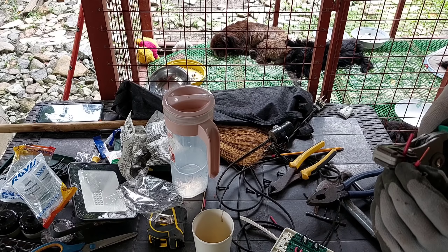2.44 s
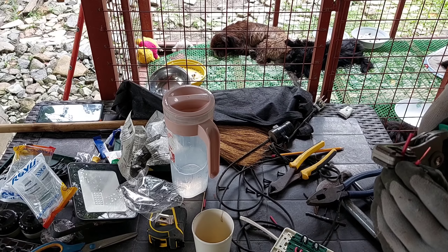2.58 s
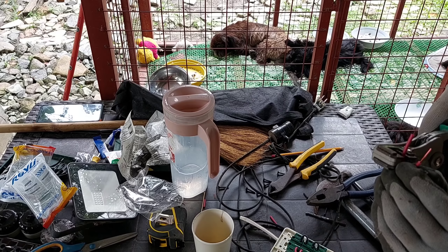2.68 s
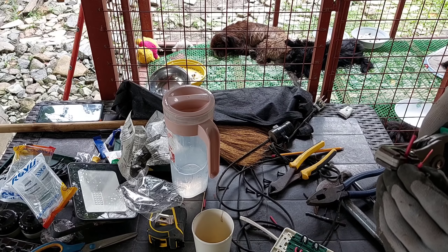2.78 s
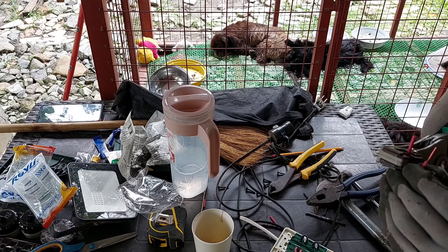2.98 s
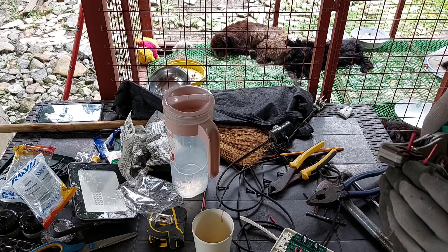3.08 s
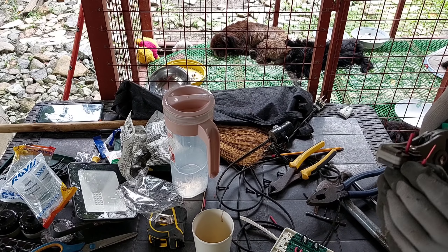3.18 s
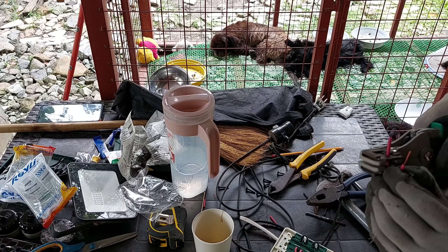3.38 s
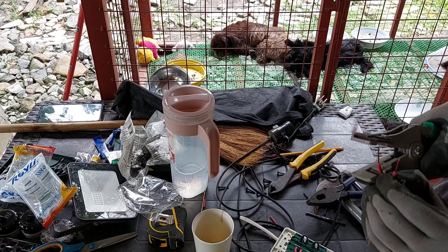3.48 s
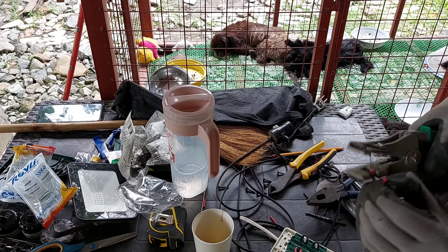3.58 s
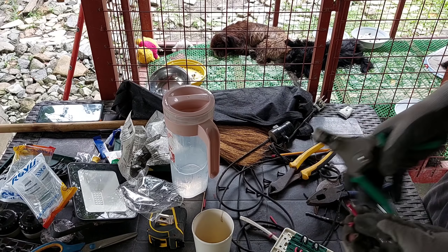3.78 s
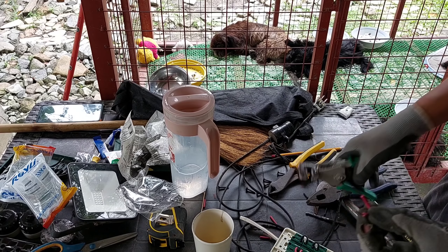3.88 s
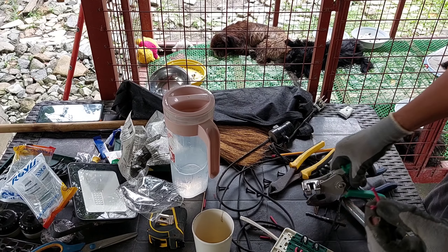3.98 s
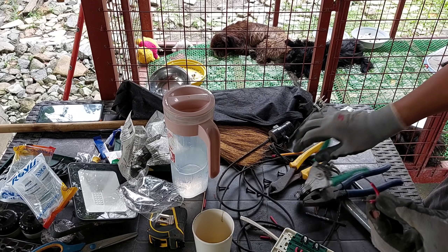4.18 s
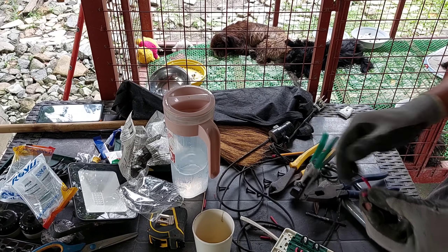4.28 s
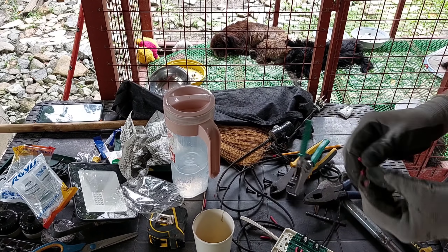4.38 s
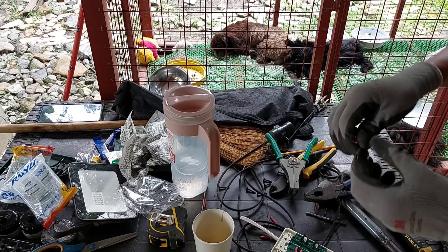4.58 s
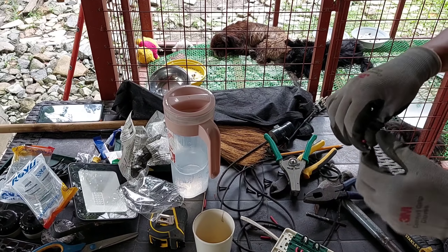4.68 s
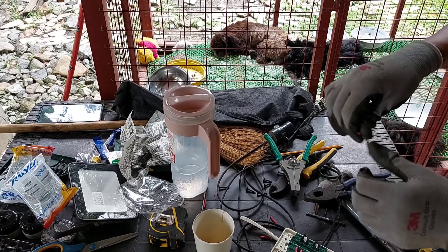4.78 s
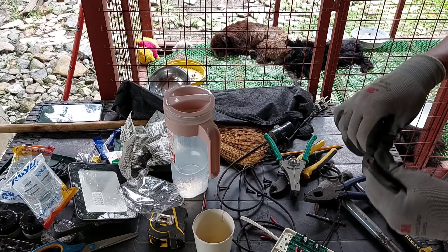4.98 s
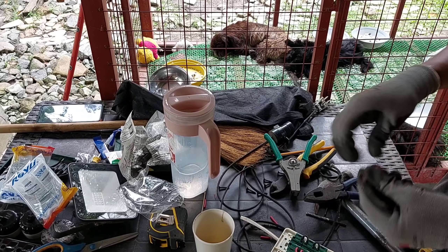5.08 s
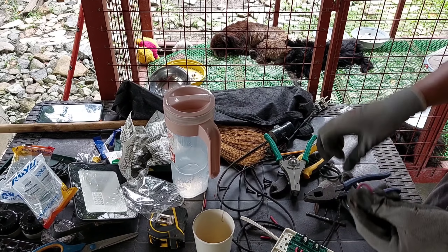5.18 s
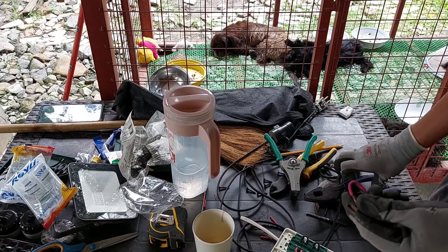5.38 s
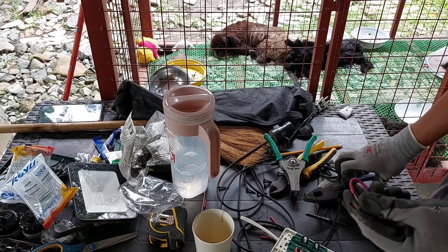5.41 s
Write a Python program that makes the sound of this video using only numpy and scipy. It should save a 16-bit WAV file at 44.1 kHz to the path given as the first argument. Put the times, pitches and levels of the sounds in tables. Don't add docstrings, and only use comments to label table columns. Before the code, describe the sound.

A stereo microphone near a cluttered workbench catches small steel clicks and two bright, dry snips of wire cutters with brief tearing insulation. A heavy hollow knock follows as the tool is put down, with sliding, small ticks and lighter bumps, then a sharp clank on metal. Short sparse echoes; quiet low traffic, leaf hiss, high insect buzz and distant birds.

```python
import sys
import numpy as np
from scipy import signal
from scipy.fft import rfft, irfft, next_fast_len
from scipy.io import wavfile
from scipy.ndimage import uniform_filter1d

SR = 44100
rng = np.random.default_rng(int(sys.argv[2]) if len(sys.argv) > 2 else 0)


def volts_from_decibels(level):
    exponent = np.asarray(level, float) / 20
    return 10 ** exponent


def dump(signal):
    limited = np.clip(np.atleast_2d(signal).T, -1, 1)
    pcm = np.round(limited * 32767).astype(np.int16)
    wavfile.write(sys.argv[1], SR, pcm)


N = 261513


def jaws():
    # t/s, peak level/dB, brightness/(dB per octave), echo/dB, left minus right/dB
    clicks = [(1.3411, -33.5, -0.5, -7, -7), (1.3914, -28, 3, -16, -3), (1.403, -41, 9, -10, 0),
              (1.4088, -27, -0.5, -9.5, 2), (1.419, -36, 0, -10, 0), (1.4590, -33, -3.5, -11.5, 1),
              (1.5842, -23, 4, -11, -4), (1.5955, -25, 9, -6, -10), (1.6146, -12.5, 1.5, -5.5, 8.5),
              (1.6215, -33, 4, -7, 4), (1.628, -26, 2, -13, -5), (3.3395, -36, 2, -15, -6),
              (3.3605, -40, 0, -0.5, 8), (3.3755, -41, -4, -7, 0), (3.3847, -41.5, -4, -7, -3),
              (3.5331, -38.5, 2.5, 2.5, 3), (3.5435, -20.5, 5, -10, -4), (3.5478, -31, -3.5, -11, 0),
              (3.695, -45, -6, 1, 0), (3.6995, -29.5, 6, -4, -3), (3.7204, -23, 0.5, 4.5, -12),
              (3.7235, -22.5, 2, -6, 1), (3.7296, -20, 4, -5, 8), (3.7425, -19, 2, -19, 4),
              (3.7502, -11.5, 2.5, -7, -12), (3.7515, -19, 6, -4, -1), (3.7545, -24, 2, -10, 1),
              (3.7615, -26, 7, -8, 2), (3.8452, -27.5, -8.5, -8, 3), (4.1638, -29.5, -5, -5.5, 4),
              (4.1873, -39, -6, -13, -1.5)]
    # t/s, peak level/dB
    fidgets = [
        (.974, -53.5),
        (1.16, -54.5),
        (1.321, -52),
        (1.5721, -41),
        (2.8718, -55),
        (3.517, -59),
        (3.987, -51.5),
    ]
    # f/Hz, level/(dB per Hz)
    jaw_spectrum = [(410, -55), (700, -16), (1840, -10), (2490, -5), (2960, -11.5), (3160, -4.5),
                    (3700, -9.5), (4820, 1), (5730, -4.5), (7170, -0.5), (14800, 1.5), (15900, -3),
                    (16500, -40)]
    # f/Hz, level/(dB per Hz)
    tear_spectrum = [(410, -49), (700, -35), (1910, -42), (2490, -7), (2700, -4.5), (2810, -17), (4060, 5),
                     (4900, 6.5), (5900, -16), (6900, 1), (13200, 5.5), (15900, 9), (16500, -50)]
    # t/s, rise/s, t60/s, level/dB
    tears = [
        (1.345, .008, 0.14, -53),
        (1.42, 0.092, 0.26, -57),
        (1.63, 0.044, 0.12, -26),
        (3.385, 0.082, 0.14, -66),
        (3.77, 0.049, 0.12, -27.5),
    ]
    tilt_db, echo_db = -6.5, 2
    rows = clicks + [(*row, tilt_db, echo_db, 0) for row in fidgets]
    direct, sent = cracks(rows, jaw_spectrum, fall_s=0.0011)
    tear = evened(coloured(grains(3000, spread_db=3.2), tear_spectrum))
    tear = tear * swells(*np.transpose(tears))
    return direct + tear + shelter(sent + tear[:1])


def jolts():
    # t/s, peak level/dB, f/Hz, t60/s
    pushes = [
        (1.6155, -12, 68, 0.03),
        (3.751, -14, 61, 0.036),
        (3.533, -30.5, 295, 0.071),
    ]
    out, t = np.zeros(N), np.arange(SR // 5) / SR
    for s, db, hz, t60 in pushes:
        phase = 2 * np.pi * hz * t * (1 + 2.5 * np.exp(-t / 0.0023))
        swing = -np.cos(phase) * (1 - np.exp(-t / 0.00071))
        add(out, s, volts_from_decibels(db - 60 * t / t60) * swing)
    return out * volts_from_decibels([[2.5], [-2.5]])


def steel():
    # t/s, peak level/dB
    strikes = [
        (4.1631, -30.5),
        (4.222, -20),
        (5.8786, -13.5),
        (5.9244, -21),
    ]
    # f/Hz, level/dB, t60/s
    strike_modes = [
        [(4460, -12, 0.12), (5040, -5, 0.056), (6400, -22, 0.09), (10250, -16, .04)],
        [(2240, 2, 0.097), (2285, -8.5, 0.17), (1707, -14, 0.16), (2896, -22, .25), (3395, -1, 0.045),
         (4330, -9, 0.1), (6304, -8, 0.088), (6600, -12, 0.096), (7930, -13.5, .06), (5140, -18, 0.073),
         (9540, -19.5, 0.18), (12630, -19, .18), (13900, -23, 0.14), (14790, -29, 0.15)],
        [(2110, -6, 0.062), (3510, 6, 0.03), (4380, -2, 0.06), (5240, -3, 0.083), (1307, 4.5, 0.06),
         (6580, -1, 0.11), (5980, -6, .12), (3919, -12, 0.07), (9240, -12.5, 0.32), (10550, -16, .12),
         (11200, -17, .12), (12650, -15, .3), (14270, -14, .05), (15180, -9, .04)],
        [(2820, -2, 0.021), (4330, -9, 0.02), (6020, -20, .1)],
    ]
    # t/s, peak level/dB
    cuts = [
        (1.342, -41),
        (1.615, -23),
        (3.751, -23),
    ]
    # f/Hz, level/dB, t60/s
    blade_modes = [(4310, -6, .16), (4560, -4, .2), (4700, -2, .22), (4795, 0, .22), (4910, -3, .2),
                   (5045, -2, .14), (5520, -8, .15), (7805, -7, .15), (12245, -6, .17), (12745, -5, .12)]
    out = np.zeros(N)
    for (s, db), modes in zip(strikes, strike_modes):
        add(out, s, volts_from_decibels(db) * ring(modes, 0))
    for s, db in cuts:
        add(out, s, volts_from_decibels(db) * ring(blade_modes, 3.8, detune=0.0022))
    direct = np.array([np.roll(out, 5), out])
    return direct + volts_from_decibels(-5.0) * shelter(out[None])


def bench():
    # f/Hz, level/dB, t60/s
    top_modes = [(125.7, -5, 0.6), (240, -2, 0.22), (173, -0.5, 0.12), (429, -8, 0.19), (260, -1, 0.049),
                 (306.8, -2.5, 0.16), (330.6, -4.5, 0.25), (375, 0, 0.11), (464, -4, 0.14), (567, -6, 0.13),
                 (522, -8, 0.11), (664, -8, 0.11), (739, -11.5, 0.067), (920, -16, 0.076),
                 (1060, -37, 0.035), (1350, -25, 0.051)]
    # t/s, peak level/dB, hardness/(dB per octave), frame level/dB, f most woken/Hz
    blows = [(4.159, -41, 14, -7, 227), (4.2205, -22, 21, -2, 727), (4.3372, -5, -0.5, -3, 342),
             (4.449, -15.5, -3, -9, 319), (4.562, -29, -12, 4, 240), (4.607, -20, -14, -3, 237),
             (4.619, -23.5, -3, 1, 251), (4.635, -22, -2, -8, 312), (4.650, -19.5, -6, -8, 325),
             (4.682, -26, -4, -6, 257), (4.782, -25.5, -13, -3, 243), (4.803, -16, -3, -27, 557),
             (4.817, -16, 0, -20, 300), (4.903, -32.5, -3, 2, 260), (5.475, -33, -15.5, -14, 171),
             (5.586, -33.5, -8.5, -4, 153), (5.691, -32.5, 13.5, -9, 486), (5.794, -33, 4, 5, 242),
             (5.8774, -10.5, 9, 2, 736), (5.8814, -10.5, -3, 0.5, 180), (5.907, -15, 2, -12, 194),
             (5.924, -5.5, -2, -4, 242)]
    # t/s, rise/s, t60/s, rumble level/dB, rattle level/dB
    slides = [(4.166, 0.014, 0.2, -35.5, -44.5), (4.222, 0.0032, 0.34, -27.5, -39.5),
              (4.341, 0.0051, 0.52, -14.5, -33), (4.4, 0.061, 0.063, -18, -39.5),
              (4.47, 0.028, 0.2, -28, -36), (4.669, 0.095, 0.48, -25, -38), (4.804, 0.0032, 0.23, -27, -49),
              (4.9, .05, 0.45, -40, -60), (5.486, 0.043, 0.28, -40.5, -67), (5.59, 0.013, 0.39, -46, -66),
              (5.694, 0.014, 0.25, -42, -52), (5.878, 0.0031, 0.46, -18, -33.5),
              (5.926, 0.006, 0.27, -30, -24.5)]
    # f/Hz, level/(dB per Hz)
    rattle_spectrum = [(530, 2.5), (900, -1), (1480, -2.5), (2270, -5.5), (4600, -13), (6700, -21.5),
                       (11200, -25.5), (15200, -29), (15900, -38), (16500, -66.5)]
    # t/s, peak level/dB, brightness/(dB per octave), echo/dB
    part_ticks = [(4.2223, -27, 7, -15), (4.3385, -15, -7, -7.5), (4.3534, -25.5, 1, 0),
                  (4.395, -32, 7, -3.5), (4.4538, -31, -1, 0), (4.5517, -39, 4, -12), (4.6097, -38, 0, -2),
                  (4.6551, -26.5, -3.5, -10), (4.6838, -32.5, 5.5, -8), (4.6945, -30, -3, 0.5),
                  (4.7849, -36, -4, -8), (4.803, -29, -1, -1), (4.9023, -43, -1.5, 2),
                  (5.0911, -44.5, -3, -8), (5.693, -59, 5, -1), (5.8775, -24.5, -6, -12),
                  (5.8825, -22.5, -2, -5), (5.891, -25, 2, 0), (5.908, -22, 1, 0)]
    contact_s = .0008
    rise = np.minimum(np.arange(SR // 5) / SR / contact_s, 1)
    out = np.zeros((2, N))
    for s, db, hard_db, frame_db, spot_hz in blows:
        modes = np.array(top_modes)
        modes[0, 1] += frame_db
        octaves = np.log2(modes[:, 0] / spot_hz)
        modes[:, 1] += 9.7 * np.exp(-(octaves / 0.12) ** 2)
        blow = [ring(modes, 2.5, hard_db, damping=0.99, detune=.012) for port in out]
        add(out, s + 0.001336, volts_from_decibels(db) * np.array(blow) * rise)

    s, rise_s, t60, rumble_db, rattle_db = np.transpose(slides)
    rumble = swells(s, rise_s, t60, rumble_db)
    rattle = swells(s, rise_s, t60 / 1.58, rattle_db)
    for spot in range(3):
        body = ring(top_modes[1:], 2.5, damping=2.6, detune=.03)
        body = body[None] / np.linalg.norm(body)
        bumps = evened(grains(300, spread_db=3.0)) * rumble
        out += volts_from_decibels(-9.5) * signal.oaconvolve(bumps, body, axes=1)[:, :N]
    out = signal.sosfilt(signal.butter(4, 102, "high", fs=SR, output="sos"), out)
    top = out[0] * volts_from_decibels([[-.5], [.5]]) + volts_from_decibels(-5.5) * out[1] * [[1], [-1]]

    loose = evened(coloured(grains(4000, spread_db=5.0), rattle_spectrum)) * rattle * volts_from_decibels(5.5)
    pan_db = 9 * rng.standard_normal(len(part_ticks))
    ticks, sent = cracks(np.c_[part_ticks, pan_db], rattle_spectrum, fall_s=0.0026)
    return top + loose + ticks + shelter(volts_from_decibels(-8.5) * top + volts_from_decibels(-7.5) * loose + sent)


def swings():
    # t/s, peak level/dB, f/Hz, t60/s, rise/s
    knocks = [(4.3385, -3.5, 335, 0.026, 0.00046), (4.3385, -11, 616, 0.019, 0.00036),
              (4.3385, -19, 1000, .04, .0003), (4.343, -8.5, 125.4, 0.28, .008),
              (3.547, -39.5, 900, 0.023, 0.00032), (3.846, -42, 1440, .05, 0.00047),
              (3.846, -45, 420, 0.053, 0.00088), (3.853, -45, 637, 0.09, 0.0023),
              (4.223, -30, 259, 0.1, .001), (4.225, -30.5, 718, 0.066, 0.00073),
              (4.635, -24, 344, 0.17, .004), (4.83, -29, 244.8, 0.49, 0.0076),
              (5.8775, -24, 990, .04, .0004), (4.342, -12, 200, .08, .002), (5.878, -18, 200, .1, .001),
              (4.608, -30, 600, .05, .0005), (4.715, -36, 1150, .12, .004), (4.633, -33, 760, .07, .002),
              (4.346, -19, 322, 0.16, 0.0022), (4.354, -14.5, 734, 0.073, 0.0024),
              (4.385, -20.5, 461, 0.13, 0.0048), (4.452, -16, 324, 0.113, .003),
              (4.468, -21.5, 127, 0.52, 0.011), (4.49, -25, 249, 0.23, .004),
              (4.648, -17.5, 160.6, .12, .004), (4.674, -24, 121.6, 0.41, 0.0071),
              (4.69, -30.5, 554, 0.082, 0.0018), (4.803, -12.5, 252, 0.094, 0.0017),
              (4.804, -20, 513, 0.086, .001), (4.818, -23.5, 436, 0.11, 0.0025),
              (5.591, -30, 188, 0.066, .002), (5.882, -17.5, 213, 0.055, 0.00071),
              (5.908, -15.5, 227, .05, 0.0011)]
    out, t = np.zeros(N), np.arange(SR // 2) / SR
    for s, db, hz, t60, rise_s in knocks:
        add(out, s, -volts_from_decibels(db - 60 * t / t60) * np.sin(2 * np.pi * hz * t) * (1 - np.exp(-t / rise_s)))
    pan_db = -3.5
    return out * volts_from_decibels([[pan_db / 2], [-pan_db / 2]])


def phrases():
    songs = [
        (0, 1.014, -64, -64.5),
        (1.72, 3.28, -72, -66),
        (4.004, 5.412, -72, -69.5),
    ]
    edge_s = 0.054
    t, level = steps(), volts_from_decibels(-73)
    for start, end, first_db, last_db in songs:
        on = np.clip(np.minimum(t - start + edge_s, end - t) / edge_s + .5, 0, 1)
        level = level + on * volts_from_decibels(np.interp(t, [start, end], [first_db, last_db]))
    return 20 * np.log10(per_sample(level))


def insect(level_db, hz, width, beats_per_s, weak, depth):
    unsteady = 1 + 0.42 * uniform_filter1d(rng.standard_normal(N), size=4000)
    beats = np.cumsum(beats_per_s * unsteady) / SR
    gate = np.sin(np.pi * beats) ** 4 * np.where(beats % 2 < 1, 1, weak)
    scrape = rng.standard_normal((2, N)) * (1 - depth + depth * gate)
    band = signal.butter(3, [hz - width, hz + width], "band", fs=SR, output="sos")
    song = evened(resonate(signal.sosfilt(band, scrape), hz, 0.65 * width))
    return volts_from_decibels(level_db + np.array([[2.], [4.]])) * song


def birds():
    # t/s, length/s
    coos = [
        (.19, .17),
        (.57, .16),
        (.9, .13),
        (1.13, .13),
    ]
    # t/s, level/dB
    pips = [
        (1.872, -72),
        (2.033, -69),
        (2.186, -66),
        (2.33, -70),
        (2.468, -70),
        (2.622, -65),
    ]
    # t/s, length/s, f/Hz, level/dB
    whistles = [(.0, .2, 1750, -69), (2.13, .14, 1710, -74), (2.22, .1, 2950, -75), (2.47, .1, 2950, -75),
                (4.5, .12, 2250, -69), (4.86, .24, 2270, -71), (5.12, .15, 1770, -71),
                (5.15, .11, 2155, -72), (5.31, .055, 1765, -67), (5.37, .07, 2110, -74),
                (.55, .07, 2920, -71), (5.43, .14, 2055, -68), (5.55, .08, 1990, -73),
                (5.37, .08, 1730, -72), (1.91, .03, 3100, -74), (2.07, .03, 3150, -73),
                (2.225, .03, 3270, -75), (2.03, .05, 2880, -78), (2.5, .03, 3270, -75),
                (2.665, .03, 3150, -73)]
    wander = .011
    # t/s, length/s, f/Hz, level/dB, relative sag, relative waver
    notes = [(s, length, 585, -62, .04, 2 * wander) for s, length in coos]
    notes += [(s, .024, 3755, db, 0, wander / 3) for s, db in pips]
    notes += [(*row, 0, wander) for row in whistles]
    out = np.zeros(N)
    for s, length, hz, db, sag, waver in notes:
        n = round(length * SR)
        drift = evened(uniform_filter1d(rng.standard_normal(SR), size=300))[:n]
        bend = np.linspace(0, -sag, n) + waver * drift
        whistle = np.sin(2 * np.pi * np.cumsum(hz * (1 + bend)) / SR)
        add(out, s, volts_from_decibels(db) * whistle * signal.windows.tukey(n, .5))
    return out + volts_from_decibels(-8) * shelter(out[None])


def traffic_and_leaves():
    # t/s, level/dB
    traffic = [(0, -44.5), (.56, -47.5), (1.5, -45.5), (1.9, -52), (2.3, -49), (2.87, -50), (3.25, -44.5),
               (3.75, -45), (4.0, -50), (5.1, -44.5), (5.3, -49), (5.93, -46)]
    # t/s, rise/s, t60/s, level/dB
    gusts = [
        (.02, 0.056, 1.3, -73.5),
        (1.25, 0.61, 3, -72.5),
    ]
    # f/Hz, level/(dB per Hz)
    hum_spectrum = [(18, -43), (32, -13), (52, 7), (78, -3), (105, 1), (135, 1), (175, -15.5), (250, -8.5),
                    (361, -19), (562, -16.5), (1030, -28), (1800, -32.5), (3000, -38), (4500, -63)]
    # f/Hz, level/(dB per Hz)
    hiss_spectrum = [(1500, -30), (3000, 0), (5000, -5), (8000, -4), (12500, -5), (13300, -14),
                     (16500, -32)]
    traffic_db = curve(traffic)
    hiss = volts_from_decibels(-77 + 0.89 * (traffic_db - traffic_db.mean())) + swells(*np.transpose(gusts))
    return air(hum_spectrum, traffic_db, patchy_db=2.5) + hiss * air(hiss_spectrum, 0, patchy_db=2.5)


def air(points, level_db, patchy_db):
    frames, hz = N // 512 + 5, np.fft.rfftfreq(2048, 1 / SR)
    a, b, c, d, patches = rng.standard_normal((frames, 1025, 5)).T
    patches = uniform_filter1d(uniform_filter1d(patches, size=5, axis=0), size=8, axis=1)
    shape = volts_from_decibels(read(points, hz)[:, None] + patchy_db * evened(patches))
    z = np.array([a + 1j * b, c + 1j * d]) * shape
    noise = signal.istft(z, nperseg=2048, noverlap=1536)[1][:, :N]
    return volts_from_decibels(level_db + 3) * evened(noise)


def shelter(x):
    # f/Hz, t60/s
    decay = [(200, 0.18), (1500, 0.22), (3000, 0.26), (4800, 0.22), (6000, 0.25), (9000, 0.2),
             (16000, 0.22)]
    taps = np.zeros((2, SR // 2))
    at = np.arange(120, SR // 2 - 8, 8) + rng.integers(0, 8, (2, (SR // 2 - 121) // 8))
    np.put_along_axis(taps, at, rng.choice([-1., 1.], at.shape), 1)
    hz, t, z = signal.stft(taps, SR, nperseg=256)
    fading = z * volts_from_decibels(-60 * t / read(decay, hz)[:, None])
    tail = signal.istft(fading, SR, nperseg=256)[1]
    return signal.fftconvolve(x, tail / np.linalg.norm(tail[0]), axes=1)[:, :N]


def cracks(rows, colour, fall_s):
    direct, sent, t = np.zeros((2, N)), np.zeros((1, N)), np.arange(1024) / SR
    bite_s = .0004
    for s, db, tilt_db, echo_db, pan_db in rows:
        burst = rng.standard_normal((3, 1024)) * np.exp(-t / fall_s) * (1 - np.exp(-t / bite_s))
        both = burst[2] + .7 * burst[:2]
        crack = coloured(np.roll(both, 14, 1), colour, tilt_db)
        crack = volts_from_decibels(db) * crack / abs(crack.mean(0)).max()
        add(direct, s, crack * volts_from_decibels([[pan_db / 2], [-pan_db / 2]]))
        snap = coloured(1. * (np.arange(1024) == 60), colour, tilt_db)
        energy = np.linalg.norm(crack[0]) / np.linalg.norm(snap)
        add(sent, s, volts_from_decibels(echo_db + 8) * snap * energy)
    return direct, sent


def grains(per_s, spread_db):
    luck = rng.random((2, 2, N))
    size = volts_from_decibels(spread_db * np.minimum(-np.log(luck[0] + 1e-9), 5))
    return size * np.sign(luck[1] * SR / per_s - .5) * (luck[1] < per_s / SR)


def ring(modes, spread_db, tilt_db=0, damping=1, detune=0):
    hz, db, t60 = np.transpose(modes)[:, :, None]
    t, luck = np.arange(SR // 5) / SR, rng.standard_normal((3, len(modes), 1))
    db = db + spread_db * luck[0] + tilt_db * np.log2(hz / 300)
    db = db - 60 * t * damping / np.clip(t60, .01, .5)
    sign = -np.sign(luck[1] + 1.4)
    pitch = hz * (1 + detune * luck[2] * np.log2(hz / 110))
    sound = (sign * volts_from_decibels(db) * np.sin(2 * np.pi * pitch * t)).sum(0)
    return sound * np.cos(t * np.pi / 2 / t[-1]) / abs(sound).max()


def resonate(x, hz, width):
    turn = np.exp(2j * np.pi * np.cumsum(hz * np.ones(x.shape[-1])) / SR)
    r = np.exp(-np.pi * width / SR)
    return 2 * (turn * signal.lfilter([1 - r], [1, -r], x / turn)).real


def coloured(x, points, tilt_db=0):
    n = next_fast_len(x.shape[-1])
    hz = np.fft.rfftfreq(n, 1 / SR)
    tilt = tilt_db * np.log2(np.maximum(hz, 1200) / 6000)
    return irfft(rfft(x, n) * volts_from_decibels(read(points, hz) + tilt), n)[..., :x.shape[-1]]


def swells(s, rise_s, t60, db):
    t = steps()[:, None] - s
    up = np.clip(-30 * t / abs(rise_s), -200, 200)
    down = np.clip(60 * t / abs(t60), -200, 200)
    return per_sample((volts_from_decibels(db) / (volts_from_decibels(up) + volts_from_decibels(down))).sum(1))


def steps():
    return np.arange(0, N / SR + .002, .001)


def per_sample(control):
    return np.interp(np.arange(N) / SR, steps(), control)


def curve(rows):
    return np.interp(np.arange(N) / SR, *np.transpose(rows))


def read(points, hz):
    f, value = np.transpose(points)
    return np.interp(np.log(hz + 1), np.log(f + 1), value)


def evened(x):
    return x / np.sqrt(np.mean(x ** 2) + 1e-20)


def add(mix, s, sound):
    part = mix[..., round(s * SR):][..., :sound.shape[-1]]
    part += sound[..., :part.shape[-1]]


def scene():
    tool = jaws() + jolts() + steel()
    table = bench() + swings()
    song = insect(phrases(), 11090, 560, 121, weak=0.93, depth=0.54)
    return tool + table + song + birds() + traffic_and_leaves()


def band_limit(x):
    return signal.sosfilt(signal.butter(12, 16650, fs=SR, output="sos"), x)


def record(dry):
    # f/Hz, level/dB
    response = [(15, -40), (30, -14), (45, 0), (15600, 0), (15900, -17), (17000, -32)]
    # f/Hz, side minus mid level/dB
    port_difference = [(60, -14), (110, -17.5), (200, -8), (380, -9), (700, -2), (1290, 1), (2380, 1),
                       (4400, 0.5), (8120, 0.5), (15000, 1)]
    mid = coloured((dry[0] + dry[1]) / 2, response)
    side = coloured(coloured((dry[0] - dry[1]) / 2, port_difference), response)
    ports = np.array([mid + side, mid - side]) * volts_from_decibels([[-.4], [.4]])
    return band_limit(ports)


dry = scene()
out = record(dry)
dump(out)
```